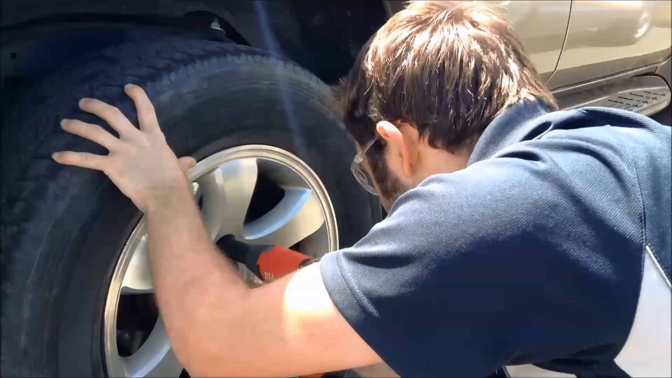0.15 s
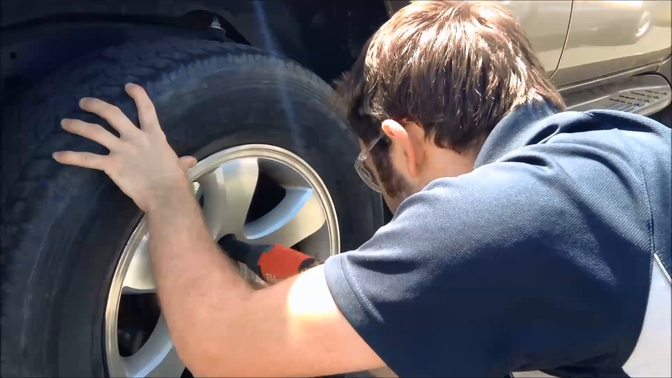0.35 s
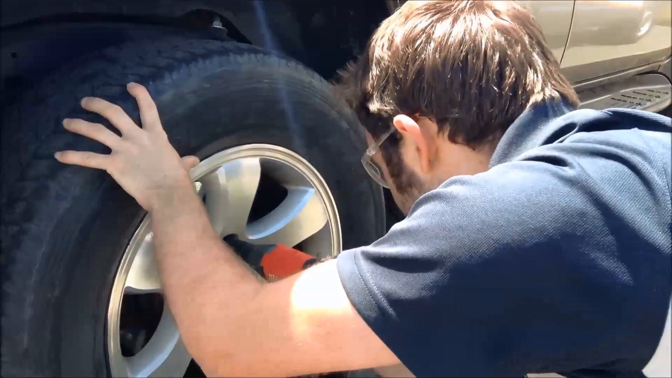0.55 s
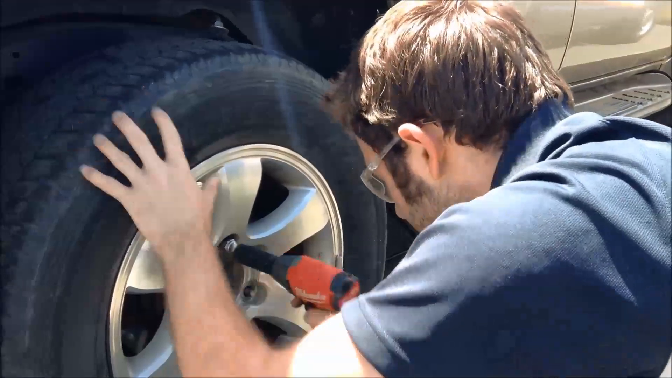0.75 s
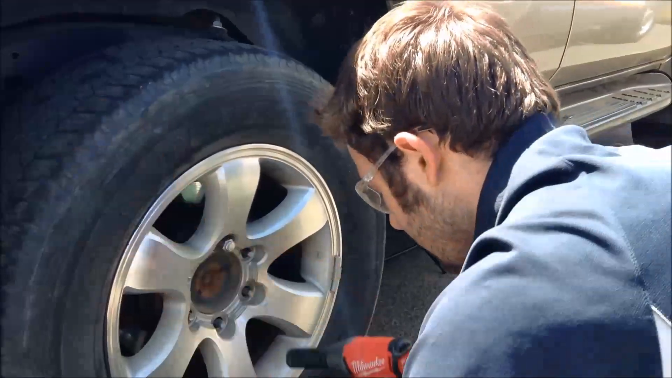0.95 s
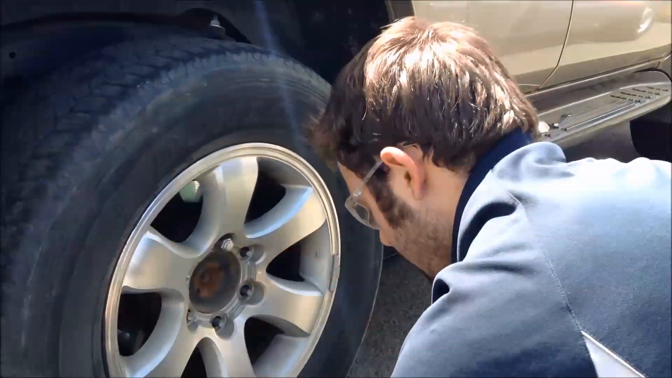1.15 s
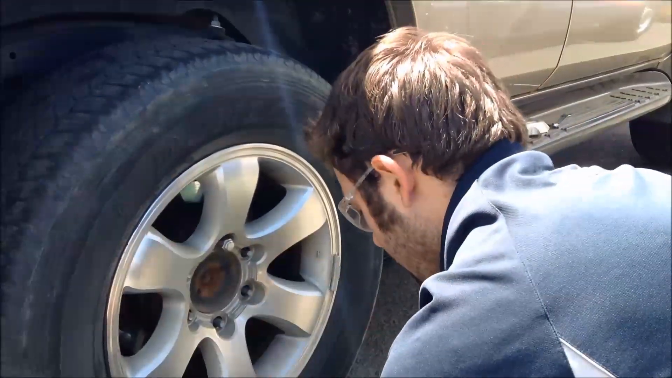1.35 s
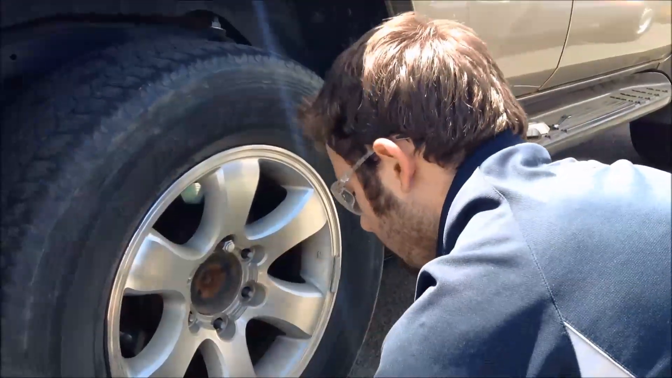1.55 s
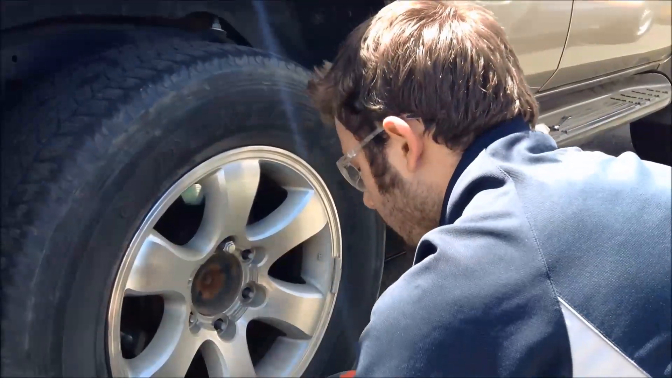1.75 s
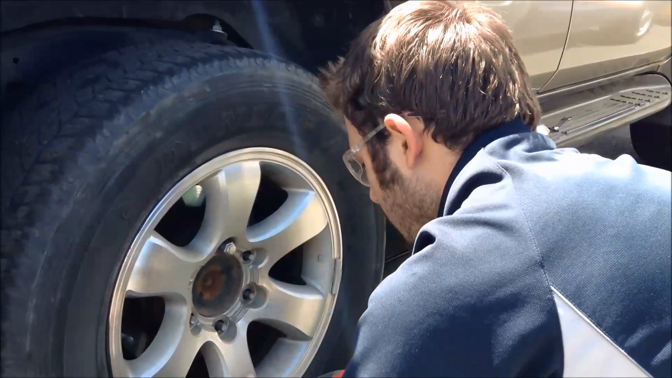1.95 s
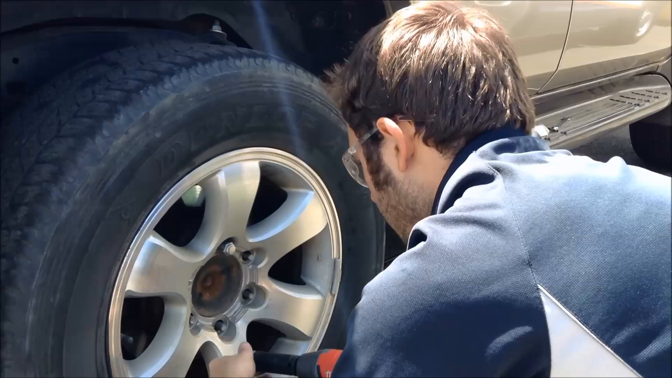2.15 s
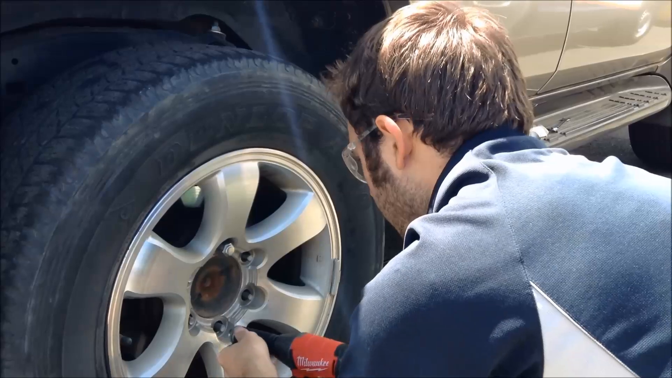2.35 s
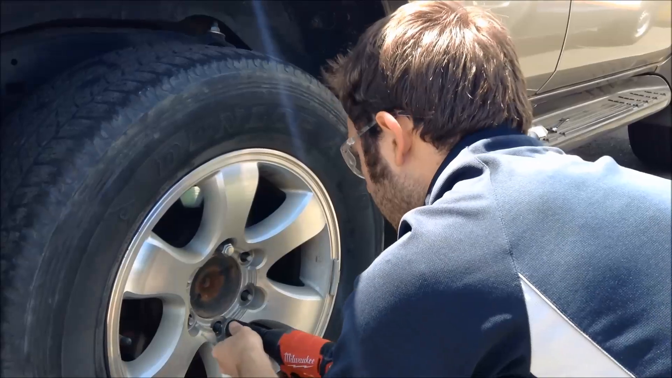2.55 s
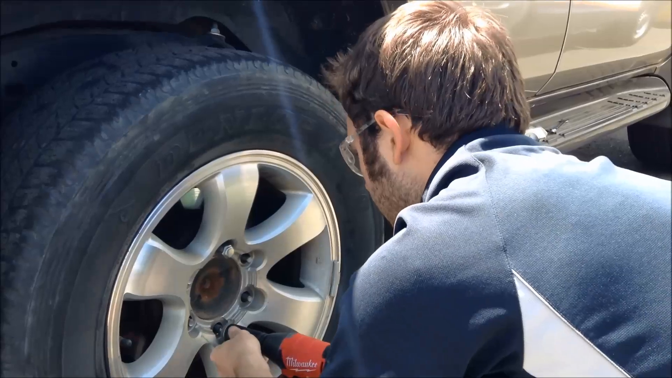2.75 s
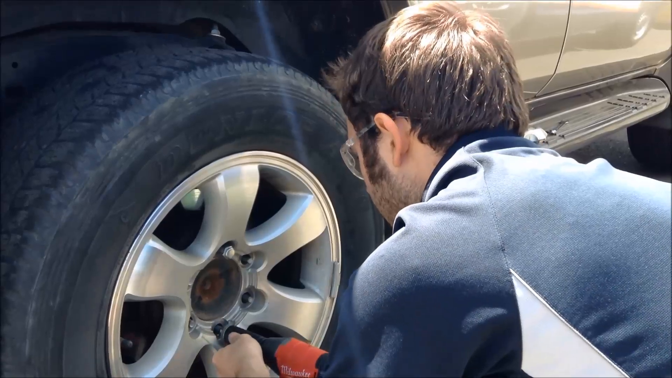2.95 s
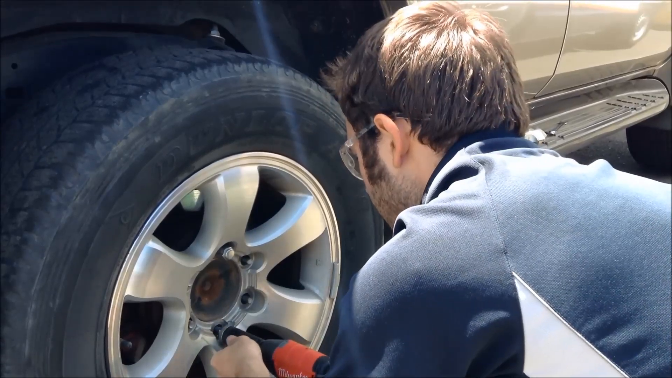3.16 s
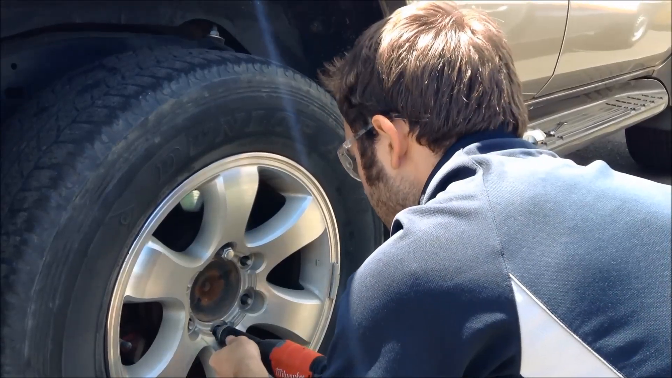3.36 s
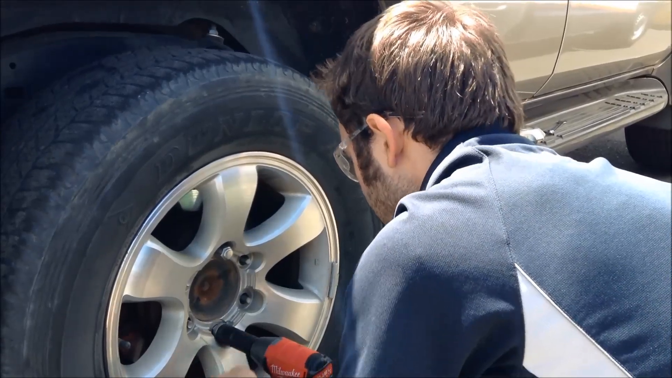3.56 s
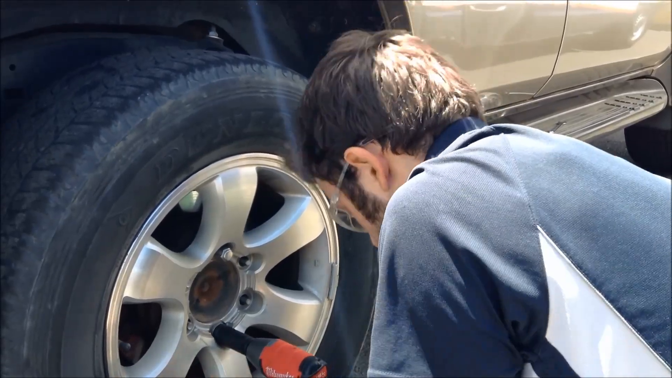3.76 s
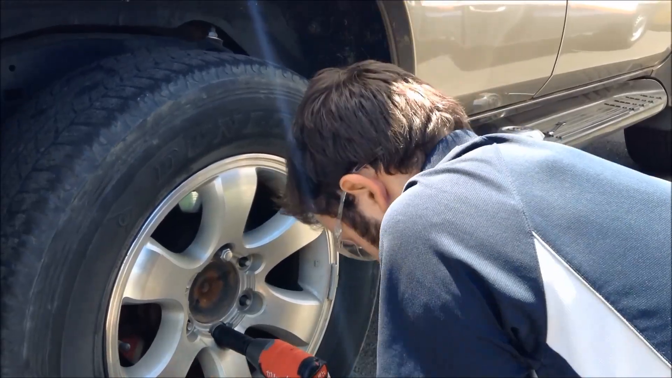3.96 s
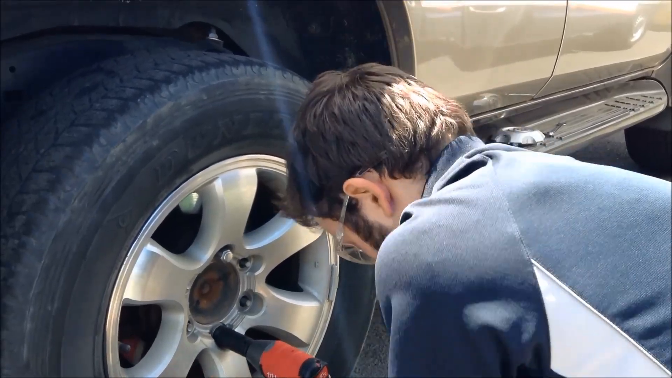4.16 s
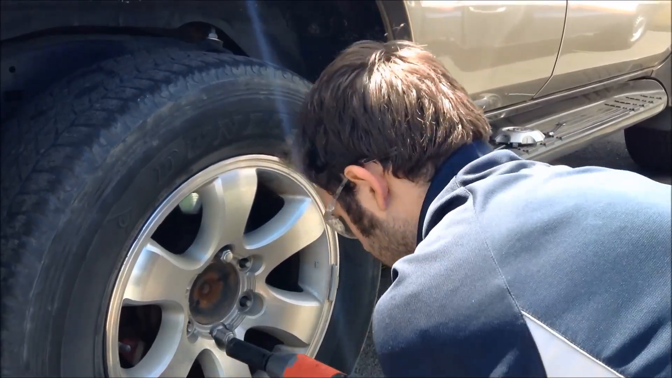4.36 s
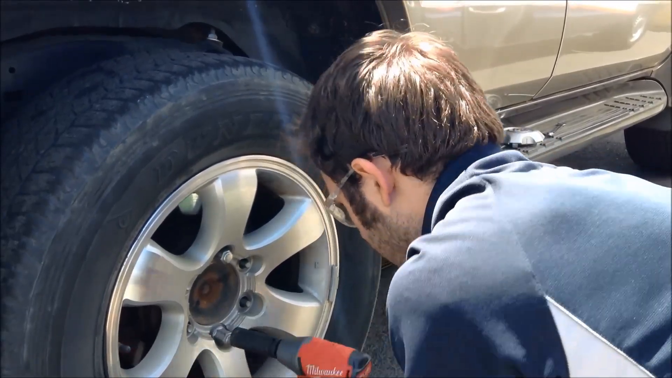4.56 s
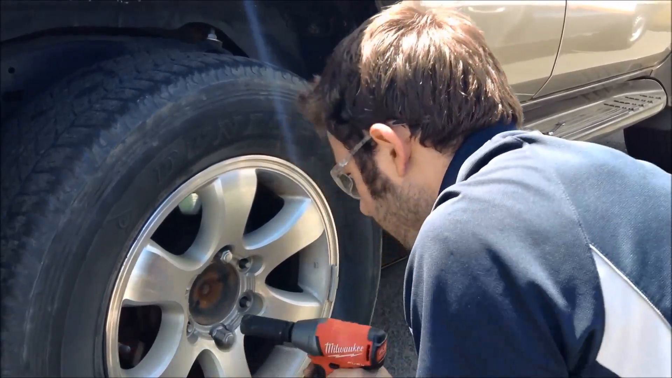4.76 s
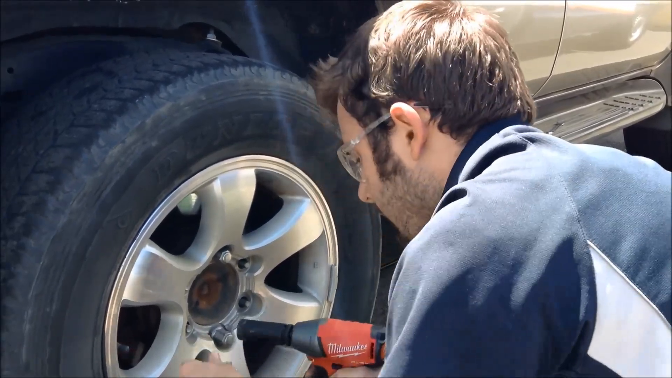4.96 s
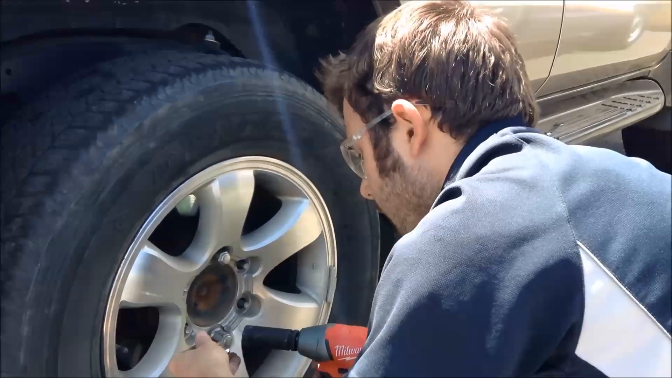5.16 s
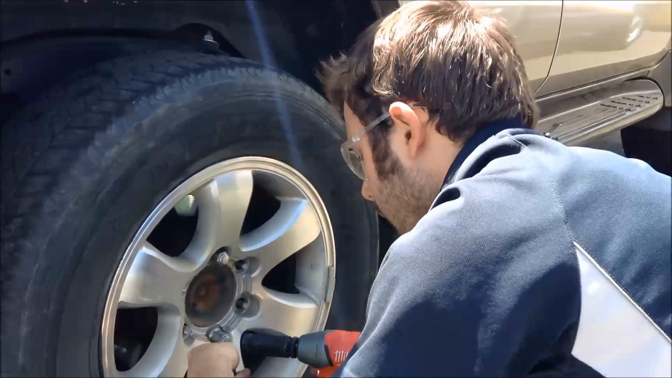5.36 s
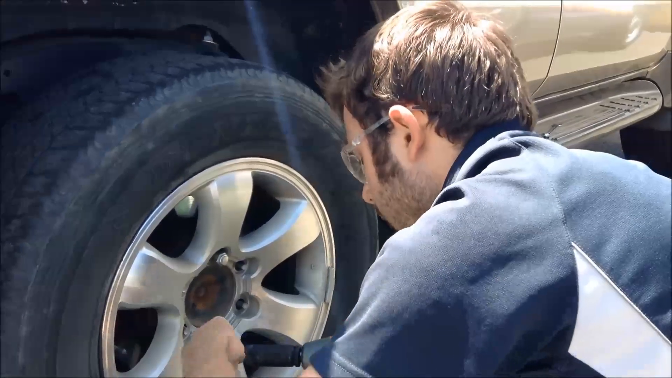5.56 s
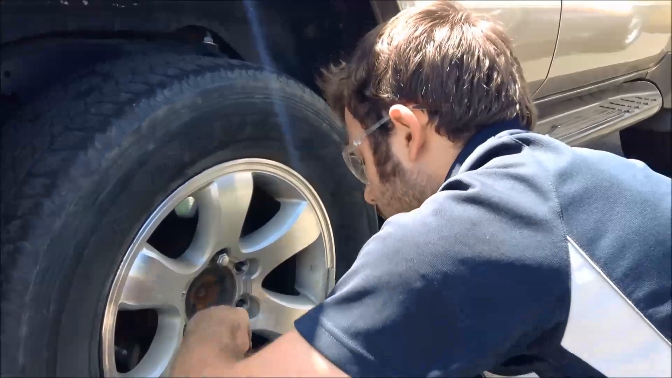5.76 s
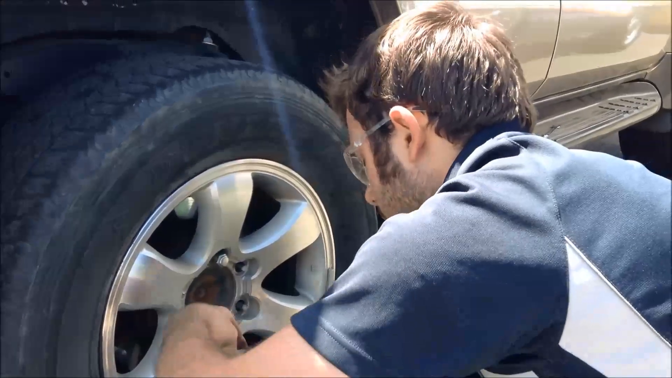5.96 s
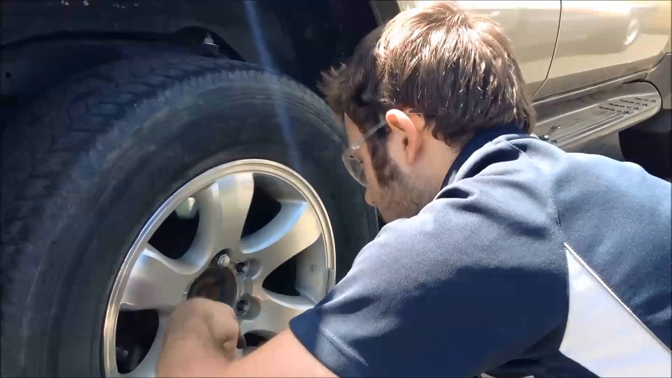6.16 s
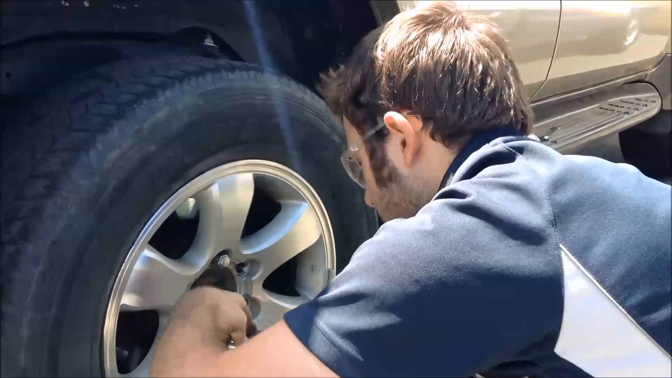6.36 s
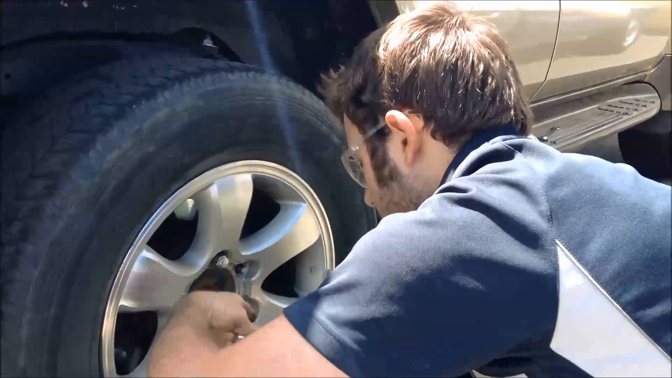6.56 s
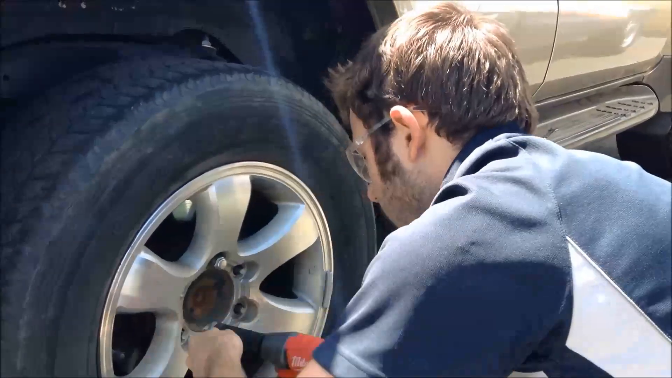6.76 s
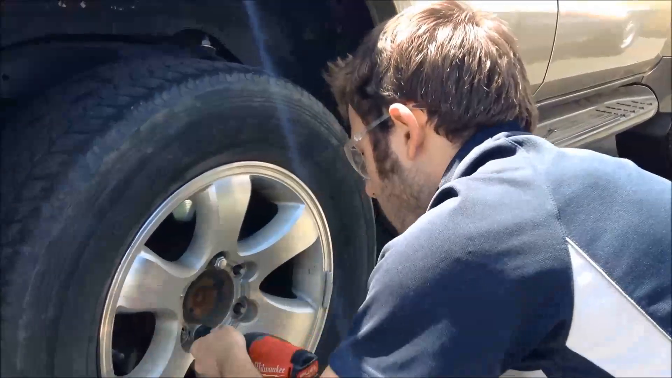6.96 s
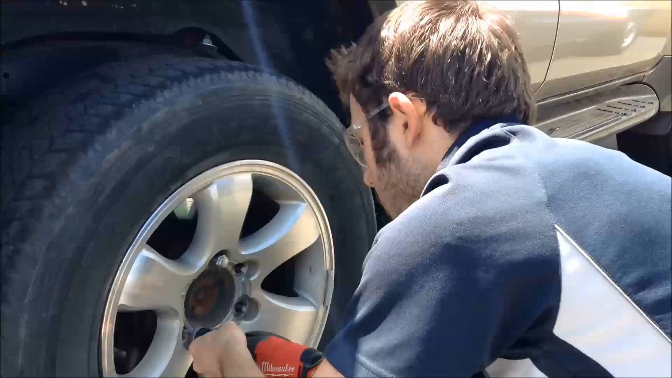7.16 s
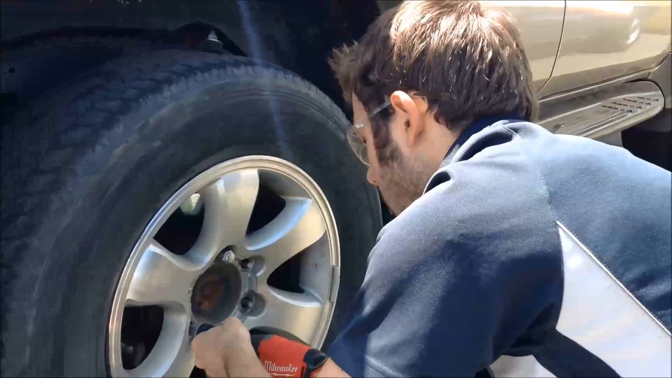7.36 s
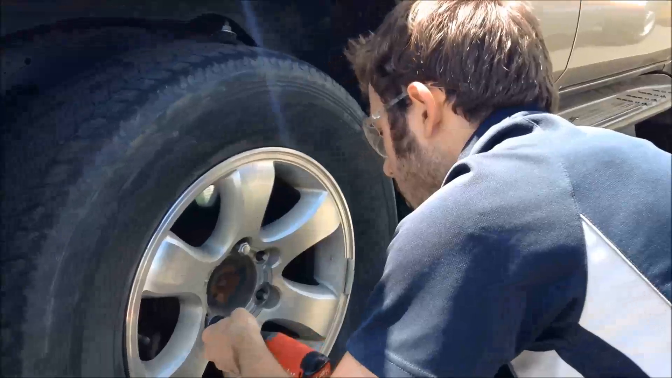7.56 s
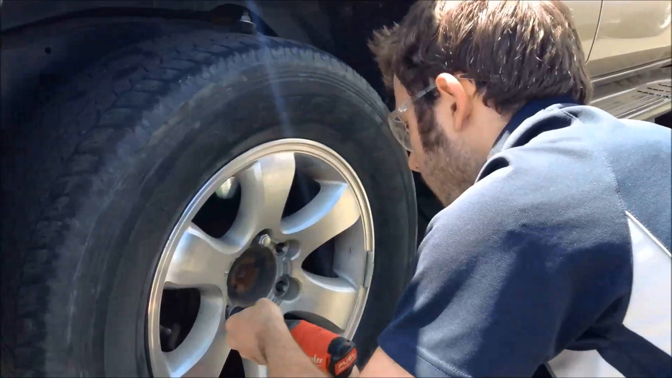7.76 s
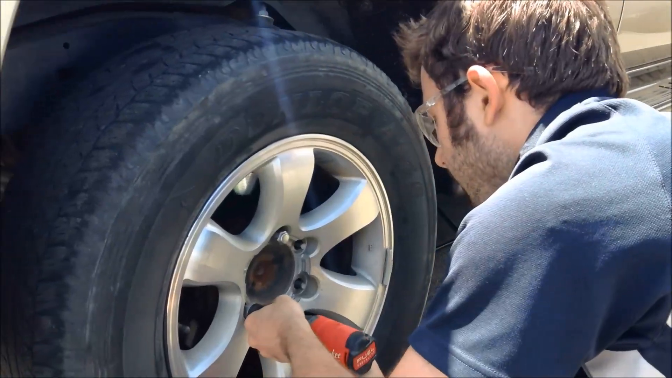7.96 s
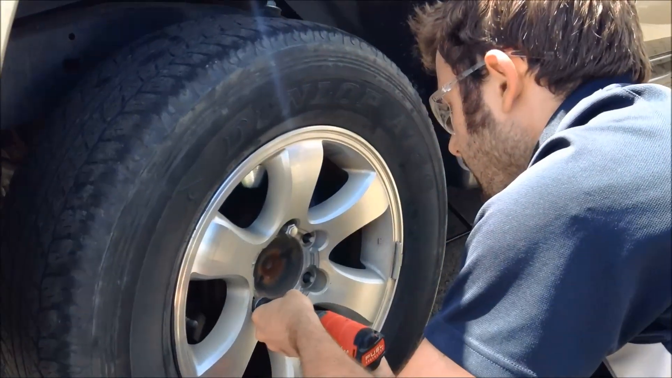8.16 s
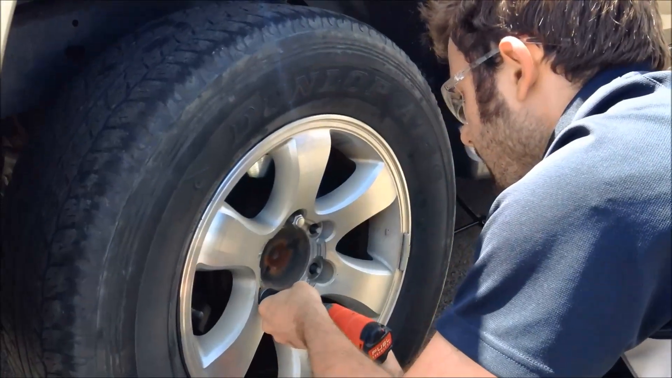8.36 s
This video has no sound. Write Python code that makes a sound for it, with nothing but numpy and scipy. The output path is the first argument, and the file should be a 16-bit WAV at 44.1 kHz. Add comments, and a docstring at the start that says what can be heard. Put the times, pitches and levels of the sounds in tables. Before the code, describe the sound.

A cordless impact wrench runs close to the microphone from the start, its motor whining and gears rattling, with sharp knocks and a fast burst of hammering on a wheel nut from 0.3 to 0.7 seconds. The alloy wheel rings briefly. From 1 to 3 seconds, nuts and socket clink lightly on the studs. At 3.1 seconds the wrench starts with two knocks, rises in pitch, then hammers loudly from 3.9 to 4.2 seconds, slightly overloading the microphone, and stops. Scattered bright clinks and clicks follow from 4.4 to 7.7 seconds, with a small scrape near 7.5. Soft, low shuffling and dull bumps grow from about 7 seconds. At 8.1 seconds the motor starts slowly again, with a few sharp cracks, running until the end at about 8.5. The garage adds a short echo, and faint, steady outdoor noise lies underneath.

```python
"""Impact wrench on wheel nuts

A garage, one microphone close to an alloy wheel as a cordless impact wrench runs the nuts on.
The motor whines, gears and socket rattle, then the hammer strikes about fifty times a second until the
nut is tight. Between runs, nuts and socket clink on the studs; low bumps and a soft outdoor murmur
lie below. The loudest cracks overload the microphone."""
import sys
import numpy as np
from scipy import signal
from scipy.fft import rfft, irfft
from scipy.io import wavfile

SR = 44100
rng = np.random.default_rng(int(sys.argv[2]) if len(sys.argv) > 2 else 0)


def store_wav(level_fs):
    """Save 16-bit WAV to argv[1]."""
    pcm = np.round(np.clip(np.atleast_2d(level_fs), -1, 1) * 32767)
    wavfile.write(sys.argv[1], SR, pcm.T.astype(np.int16))


N = 374850
TIME = np.arange(N) / SR
FULL_SPEED_HZ = 1400

# motor speed, one curve for each pull of the trigger: (time [s], commutation rate [Hz])
SPEED_CURVES = [
    [(0, 1290), (.04, 1270), (.11, 1080), (.15, 880)],
    [(.16, 450), (.22, 250), (.27, 400), (.33, 1100), (.675, 1000)],
    [(3.078, 40), (3.11, 250), (3.16, 480), (3.38, 470), (3.5, 920), (3.58, 1050), (3.7, 1100),
     (3.77, 1230), (3.84, 1270), (4.245, 1000)],
    [(8.116, 10), (8.18, 50), (8.22, 130), (8.3, 320), (8.4, 380), (8.5, 550)],
]
# runs of hammering: (first blow [s], last blow [s], nut comes tight [s], crack [dB], thump [dB])
HAMMER_RUNS = [(0.3106, 0.635, .362, -5, -39.5), (3.8725, 4.2185, 4.115, -4, -20)]
# spectrum of steel meeting steel: (frequency [Hz], level [dB])
CLACK_SPECTRUM = [(200, -13), (600, -5), (1200, -2.5), (1900, -3.5), (2700, 1.5), (3900, -0.5), (5000, -3),
                  (7000, -17.5), (15000, -37)]


def from_db(db):
    """Decibels to gain."""
    return 10 ** (np.asarray(db) / 20)


def rms_one(x):
    """Scale to unit rms."""
    return x / np.sqrt(np.mean(x ** 2) + 1e-20)


def unit_energy(x):
    """Scale a response so that it keeps the power of white noise."""
    return x / np.sqrt(np.sum(x ** 2) + 1e-20)


def drift(per_s):
    """A random wander of unit rms, with per_s new values a second."""
    knots = rng.standard_normal(N // 8)
    return rms_one(np.interp(TIME * per_s, np.arange(len(knots)), knots))


def grainy_noise(spread_db, per_s):
    """Noise of unit rms whose level flickers."""
    return rms_one(rng.standard_normal(N) * from_db(spread_db * drift(per_s)))


def through(x, response):
    """Pass a sound through an impulse response."""
    return signal.fftconvolve(x, response)[:len(x)]


def colour(x, spectrum, size=4096):
    """Shape a sound with a minimum-phase filter of unit energy."""
    hz, db = np.transpose(spectrum)
    log_hz = np.log(np.maximum(np.arange(size // 2 + 1) * SR / size, 1))
    bass_cut_db = 20 * np.maximum(np.log(hz[0]) - log_hz, 0)
    gain = from_db(np.interp(log_hz, np.log(hz), db) - bass_cut_db)
    cepstrum = irfft(np.log(gain))[:size // 2]
    cepstrum[0] = 0
    return through(x, unit_energy(irfft(np.exp(rfft(2 * cepstrum, size)))))


def mode(hz, t60):
    """A decaying sine of unit energy."""
    t = TIME[:SR]
    return unit_energy(np.sin(2 * np.pi * hz * t) * from_db(-60 * t / t60))


def add(out, s, sound):
    """Mix a sound in at a time."""
    at = max(round(s * SR), 0)
    out[at:at + len(sound)] += sound[:N - at]


def outdoor_murmur(level_db):
    """Soft, steady noise from outside, mostly low."""
    # spectrum of the open air: (frequency [Hz], level [dB])
    air_spectrum = [(24, -67.5), (40, -31.5), (82, -14.5), (247, 0), (309, -4), (333, -5.5), (368, -8),
                    (686, -7.5), (1310, -15), (1410, -15), (2450, -21.5), (12100, -33), (15500, -39)]
    return from_db(level_db) * colour(rng.standard_normal(N), air_spectrum)


def motor_speed():
    """The motor's commutation rate along time, in Hz."""
    return np.interp(TIME, *np.transpose(np.vstack(SPEED_CURVES)))


def trigger(part, run_down_s=.007):
    """Gain of "rattle" or "whine" while the trigger is held, fading quickly on either side."""
    # strength of each pull: (gear rattle [dB], drive whine [dB])
    pull_levels = [(-22, -23.5), (-17.5, -39), (-19, -22.5), (-18.5, -29.5)]
    column = ("rattle", "whine").index(part)
    gain = np.zeros(N)
    for levels, curve in zip(pull_levels, SPEED_CURVES):
        outside_s = np.abs(TIME - np.clip(TIME, curve[0][0], curve[-1][0]))
        gain += from_db(levels[column]) * np.exp(-np.minimum(outside_s / run_down_s, 20))
    return gain


def motor_whine(switching_hz, upper_db, waver_db, waver_hz, hammering_db, idle_gain):
    """Two sidebands of the drive's switching tone part as the motor speeds up; hammering ducks them."""
    speed = motor_speed()
    offset_hz = speed + waver_hz * drift(150)
    lower, upper = (np.sin(2 * np.pi * np.cumsum(switching_hz + side * offset_hz) / SR)
                    for side in (-1, 1))
    swell = idle_gain + np.sin(np.pi * speed / FULL_SPEED_HZ) ** 1.5   # loudest at half speed
    loaded = sum((TIME > first) & (TIME < last + .03) for first, last, *_ in HAMMER_RUNS)
    level = trigger("whine") * swell * from_db(waver_db * drift(110) + hammering_db * loaded)
    return np.sqrt(2) * (lower + from_db(upper_db) * upper) * level


def gear_rattle(level_db, grain_db, wobble_db, cycles_per_turn):
    """Teeth and loose socket chatter, louder with speed and swelling once a turn of the socket."""
    # spectrum of the gearbox: (frequency [Hz], level [dB])
    gear_spectrum = [(59, -47), (100, -22.5), (196, -23), (275, -16), (313, -13.5), (429, -18.5),
                     (898, -14.5), (1110, -6.5), (1460, -12), (2470, -10), (7410, -10.5), (9340, -6.5),
                     (10400, -13.5), (13900, -13), (15500, -25)]
    speed = motor_speed()
    turns = np.cumsum(speed) / SR / cycles_per_turn
    flutter = from_db(grain_db * drift(700) + wobble_db * np.sin(2 * np.pi * turns))
    chatter = rms_one(rng.standard_normal(N) * flutter)
    level = from_db(level_db) * trigger("rattle") * speed / FULL_SPEED_HZ
    return colour(chatter * level, gear_spectrum)


def gear_tones(low_db, mesh_db, steepness, waver_hz):
    """Two orders of the motor sing out of the rattle as it nears full speed."""
    speed = motor_speed()
    phase = 2 * np.pi * np.cumsum(speed + waver_hz * drift(300)) / SR
    tones = from_db(low_db) * np.sin(2 * phase) + from_db(mesh_db) * np.sin(13 / 4 * phase)
    return tones * (speed / speed.max()) ** steepness * trigger("rattle")


def wheel(force):
    """The wheel rings with whatever shakes its studs."""
    # modes of wheel, hub and brake disc: (frequency [Hz], level [dB], t60 [s])
    wheel_modes = [(287.4, -9, 0.41), (328.9, -8.5, 0.54), (1094, -1.5, 0.12), (1195, -3.5, 0.57),
                   (1660, -5.5, 0.21), (2000, -5, .2), (2360, -2, 0.3), (2508, 3, 0.15), (2680, -3.5, 0.22),
                   (3314, -5, .25), (3705, -2.5, 0.17), (3890, -9.5, 0.22), (4240, -5.5, 0.19),
                   (4355, -2.5, 0.55), (4470, -8, 0.31), (5330, -14, .15)]
    response = sum((-1) ** k * from_db(db) * mode(hz, t60) for k, (hz, db, t60) in enumerate(wheel_modes))
    return through(force, unit_energy(response))


def touches(settle_s=.032, settle_db=-28):
    """Nut and socket meet, then touch once more, softly, as they settle."""
    # (time [s], strength [dB], steel ring re strength [dB], ring pitch [Hz],
    #  socket cavity re strength [dB], contact time [s])
    meetings = [(.002, -31, 17, 13400, -15, 0.0025), (.039, -28, 13, 13000, -32, .0015),
                (0.9714, -33, -9.5, 13470, -17, 0.0012), (1.282, -47, 1, 12240, -3, 0.0018),
                (1.39, -44.5, 14, 11630, -17, .0025), (1.8217, -25.5, 5.5, 12630, -9.5, 0.0028),
                (1.9367, -22.5, 16, 13900, -34, 0.0017), (2.177, -39.5, 8, 13000, -7, 0.0019),
                (2.2463, -21, 12.5, 12880, -33, 0.0018), (2.387, -37, 17, 13000, -22, 0.0033),
                (2.66, -16, 2.5, 13900, -13, 0.0033), (2.758, -27, -0.5, 12400, -14, 0.0038),
                (2.8395, -49.5, -9, 11700, -4, 0.0033), (2.9873, -50, -6.5, 12800, 3.5, 0.0031),
                (4.4191, -47, 6, 12800, -8, .0014), (4.556, -47, 11, 12420, -14, .001),
                (5.3086, -46.5, 28, 11830, -12, 0.0016), (5.327, -49.5, 32, 11950, -8, 0.0018),
                (5.376, -47, 15, 12500, -6, .002), (5.5916, -32.5, -0.5, 12200, 0, 0.0017),
                (5.7564, -41, -9, 13500, -26, 0.00094), (5.7877, -41, 7, 12900, 2, 0.0021),
                (5.8015, -26, 11.5, 12930, -1.5, 0.0032), (5.955, -34.5, 4.5, 12800, -4.5, 0.0045),
                (6.492, -47.5, 3, 13200, 6, .006), (6.5464, -19.5, 15.5, 13570, -26, 0.0018),
                (6.637, -31.5, 4.5, 12100, -4, .0032), (6.6965, -53, 23.5, 12030, -10, 0.0012),
                (7.0961, -26, 7.5, 12740, -27, 0.0017), (7.1057, -25, 13, 13300, -16, .001),
                (7.1597, -26.5, 6.5, 13400, -30, 0.0029), (7.213, -42.5, 2, 11800, -22, .002),
                (7.376, -45, 8, 14100, -5, .0015), (7.3894, -35.5, 0, 12900, -22, .001),
                (7.436, -38.5, -5, 12300, -11.5, 0.0044), (7.4547, -41.5, 18, 11900, -8, 0.0013),
                (7.4937, -23.5, 9.5, 13000, -30, 0.0026), (7.5441, -38, 1, 13300, -25, 0.0023),
                (7.6572, -52.5, -16, 12200, 3, 0.0019)]
    waits = settle_s * rng.uniform(.8, 1.2, len(meetings))
    settling = [(s + wait, db + settle_db, *timbre) for (s, db, *timbre), wait in zip(meetings, waits)]
    return list(meetings) + settling


def clinks(scratch_db, shimmer_db, ring_db, hollow_db, hollow_hz, hollow_t60,
           brush_db, brush_s, skitter_s):
    """Steel chatters on steel: a clack and a scratch, then high modes and the socket's air cavity ring."""
    # spectra of the scratch and of the cluster of high modes: (frequency [Hz], level [dB])
    scratch_spectrum = [(2000, -29), (4500, -2.5), (6200, 2), (8000, 2), (9500, -1.5), (10600, -6),
                        (11700, -4), (15000, -6.5)]
    shimmer_spectrum = [(10500, -28), (11700, -4.5), (12300, -0.5), (12850, 6), (13300, 1), (13900, -3),
                        (14400, -16.5), (15200, -8)]
    # the free nut rings on, the hand-held socket dies fast: (ring pitch [Hz], t60 [s])
    steel_decay = [(12100, .13), (12900, 0.056), (13500, 0.019)]
    t = TIME[:SR // 3]
    clacks, scratches, shimmer, rings = np.zeros((4, N))
    # the parts brush just before they meet and skitter afterwards
    lead_s = .02
    since = t - lead_s
    brush = from_db(brush_db) * np.exp(-np.abs(since) / np.where(since < 0, brush_s, skitter_s))
    for s, db, steel_db, hz, cavity_db, contact_s in touches():
        age = np.maximum(since, 0) / contact_s
        press = age * np.exp(1 - age)
        clack_db = db - .64 * steel_db   # a free nut rings, a held one clacks
        add(clacks, s - lead_s, from_db(clack_db) * (press + brush))
        add(scratches, s - lead_s, from_db(db + scratch_db) * (press + brush))
        add(shimmer, s - lead_s, from_db(db + steel_db + shimmer_db) * press)
        steel = (steel_db + ring_db, hz, np.interp(hz, *np.transpose(steel_decay)))
        cavity = (cavity_db + hollow_db, hollow_hz, hollow_t60)
        build_up = 1 - np.exp(-(t / contact_s) ** 2)
        for level, pitch, t60 in steel, cavity:
            tone = mode(pitch, t60)[:len(t)] * build_up
            add(rings, s, from_db(db + level) * tone / np.abs(tone).max())
    chatter = grainy_noise(spread_db=2.5, per_s=1500)
    contact = colour(clacks * chatter, CLACK_SPECTRUM) + colour(scratches * chatter, scratch_spectrum)
    return contact, rings + colour(shimmer * chatter, shimmer_spectrum)


def bumps(rise_s):
    """Tool and tyre bump dully, each time with one low, dying tone."""
    # (time [s], level [dB], pitch [Hz], t60 [s])
    thuds = [(0.113, -11.5, 219, 0.1), (0.115, -20, 283.3, 0.55), (0.158, -14.5, 298, 0.14),
             (2.386, -34, 197, 0.087), (3.871, -9, 176, 0.038), (4.225, -28.5, 332.6, 0.35),
             (5.49, -32, 188, 0.045), (7.148, -19.5, 196, 0.04), (7.324, -17.5, 179, 0.032),
             (7.848, -23, 200, 0.047)]
    t, out = TIME[:SR], np.zeros(N)
    attack = 1 - np.exp(-t / rise_s)
    for s, db, hz, t60 in thuds:
        add(out, s, from_db(db - 60 * t / t60) * np.sin(2 * np.pi * hz * t) * attack)
    return out


def knocks(uneven_db, skip_s=.015, skip_db=-9.5):
    """The socket catches or the hammer stops; weaker skips over the nut's corners may follow."""
    # (time [s], crack [dB], wheel kick [dB], skips [count, rounded; none if negative])
    catches = [(.114, -17, -12.5, 2.5), (.136, 1, -13.5, 2), (0.179, -5.5, -23, -3),
               (0.2411, -4, -12.5, -1), (0.276, -7, -25.5, -2.5), (.283, -3, -19.5, 1),
               (0.659, -4, -9, 0.5), (0.666, -6, -17.5, -2), (3.124, -6, -14.5, 0.5), (3.192, -8, -25, 2),
               (4.234, -3.5, -9, 0.5), (8.2304, -1.5, -12, 4), (8.29, -5, -17, 0.5)]
    blows = []
    for s, db, kick_db, skips in catches:
        blows.append((s, db, kick_db))
        for k in range(1, round(skips) + 1):
            crack_db = db + skip_db + uneven_db * rng.standard_normal()
            blows.append((s + k * skip_s, crack_db, kick_db + skip_db))
    return blows


def hammer(blows_per_s, crack_s, rebound_db, rebound_s, thump_s, thump_hz,
           clang_s, loose_db, tight_db, kick_db, uneven_db):
    """Each blow cracks, thumps the tyre and kicks the wheel; it clangs harder once the nut is tight."""
    # spectra of the crack and of the clang: (frequency [Hz], level [dB])
    crack_spectrum = [(40, -47), (120, -36), (300, -8), (450, -5.5), (800, 0), (1200, 1.5), (1800, -1.5),
                      (2400, 4), (3000, 1.5), (3800, 1.5), (5500, 3), (7000, 1), (9500, 2), (15000, 1)]
    clang_spectrum = [(2000, -32), (3000, -12.5), (3350, -1), (3700, -1), (4200, -1.5), (4600, -6),
                      (6500, -16), (9000, -30)]
    t = TIME[:SR // 8]
    crack_power, thumps, clang_level, kicks = np.zeros((4, N))
    blows = knocks(uneven_db)
    for first, last, tight, db, thump_db in HAMMER_RUNS:
        progress = np.linspace(0, 1, round((last - first) * blows_per_s) + 1)
        for s in first + (last - first) * progress ** .98:   # the first blows come a little slower
            jitter_s = .0003 * rng.standard_normal()
            blows.append((s + jitter_s, db + uneven_db * rng.standard_normal(), db + kick_db))
            pitch = thump_hz * 2 ** rng.uniform(-.18, .66)
            add(thumps, s, from_db(thump_db) * np.exp(-t / thump_s) * np.sin(2 * np.pi * pitch * t))
            clang_db = np.interp(s, [tight - .015, tight + .015], [loose_db, tight_db])
            add(clang_level, s, from_db(clang_db) * np.exp(-t / clang_s))
    # a hard crack with a buzz of loose steel after it
    blow_power = np.exp(-(t / crack_s) ** 2) + from_db(rebound_db) ** 2 * np.exp(-t / rebound_s)
    for s, db, wheel_db in blows:
        add(crack_power, s, from_db(db) ** 2 * blow_power)
        add(kicks, s, from_db([wheel_db]))
    cracks = colour(np.sqrt(crack_power) * rng.standard_normal(N), crack_spectrum)
    clangs = colour(clang_level * rng.standard_normal(N), clang_spectrum)
    return thumps + cracks + clangs, kicks


def strokes(rows):
    """Gain of strokes that swell and fade between a start and an end."""
    gain = np.zeros(N)
    for start, end, db in rows:
        position = (2 * TIME - start - end) / (end - start)
        gain += from_db(db) * np.sqrt(np.maximum(1 - position ** 2, 0))
    return gain


def shuffling(gain_db):
    """Someone shifts about beside the wheel with a soft, lumpy rumble."""
    # (start [s], end [s], level [dB])
    moves = [(.9, 2.0, -56), (2.3, 2.85, -54.5), (3.3, 3.9, -48.5), (5.4, 6.1, -57.5), (6.77, 7.0, -51.5),
             (7.08, 7.56, -44.5), (7.58, 8.15, -44.5), (8.15, 8.6, -42.5)]
    # spectrum of the rumble: (frequency [Hz], level [dB])
    shuffle_spectrum = [(30, -47), (70, -12.5), (120, 2), (190, 6), (290, -3.5), (420, -10.5), (900, -54.5)]
    lumps = grainy_noise(spread_db=4, per_s=30)
    return from_db(gain_db) * strokes(moves) * colour(lumps, shuffle_spectrum)


def scrapes(grit_db):
    """The socket drags over a nut, steel on steel, in a stream of tiny catches."""
    # (start [s], end [s], level [dB])
    drags = [(4.66, 4.753, -54), (6.49, 6.545, -55.5), (7.429, 7.533, -42.5)]
    return colour(strokes(drags) * grainy_noise(grit_db, per_s=600), CLACK_SPECTRUM)


def garage(x, near_db, near_s, build_s):
    """The direct sound, quick reflections from ground and car, then a diffuse tail."""
    # reverberation of the garage: (frequency [Hz], t60 [s], level [dB])
    tail_bands = [(250, 0.83, -9.5), (1000, .85, -11), (2500, 0.79, -16.5), (4446, 0.88, -18.5),
                  (8190, 1, -26.5), (13000, .4, -26.5)]
    hz, t60, db = np.transpose(tail_bands)
    t = TIME[:SR]
    response = from_db(near_db) * unit_energy(rng.standard_normal(SR) * np.exp(-t / near_s) * (t > .002))
    edges = np.geomspace(100, 16000, 13)
    for low, high in zip(edges, edges[1:]):
        bandpass = signal.butter(2, [low, high], "band", fs=SR, output="sos")
        band = signal.sosfilt(bandpass, rng.standard_normal(SR))
        log_centre = np.log(low * high) / 2
        band_t60, band_db = (np.interp(log_centre, np.log(hz), column) for column in (t60, db))
        envelope = from_db(-60 * t / band_t60) * (1 - np.exp(-t / build_s))
        response += from_db(band_db) * band * unit_energy(envelope)
    return x + through(x, response)


def scene():
    """Wrench and wheel close by in the garage; the small rings of nut and socket stay dry."""
    blows, kicks = hammer(blows_per_s=49, crack_s=.003, rebound_db=-9.5, rebound_s=.011,
                          thump_s=.0076, thump_hz=201, clang_s=.01, loose_db=-22.5, tight_db=-11.5,
                          kick_db=-14.5, uneven_db=1.5)
    gears = gear_rattle(level_db=.5, grain_db=2, wobble_db=2, cycles_per_turn=42)
    nut = from_db(-21.5) * through(gears, mode(hz=15000, t60=.03))   # the spinning nut rings along
    whine = motor_whine(switching_hz=10070, upper_db=-21, waver_db=1.45, waver_hz=4.6,
                        hammering_db=-14, idle_gain=.12)
    whine += gear_tones(low_db=-9.5, mesh_db=-7, steepness=3.5, waver_hz=22)
    contact, rings = clinks(scratch_db=-1, shimmer_db=-6.5, ring_db=-5,
                            hollow_db=-.5, hollow_hz=1311, hollow_t60=.07,
                            brush_db=-16, brush_s=.003, skitter_s=.012)
    ringing = wheel(from_db(19.5) * kicks + from_db(-20) * gears + from_db(-23) * contact)
    direct = blows + gears + nut + whine + ringing + contact + scrapes(grit_db=5)
    wrench = rings + garage(direct, near_db=-11, near_s=.0083, build_s=.003)
    background = outdoor_murmur(level_db=-51.5) + shuffling(gain_db=3) + bumps(rise_s=.0029)
    return (wrench + background)[None]


def record(dry):
    """The close microphone rounds off the loudest cracks; the highest treble is cut."""
    ceiling, cutoff_hz = .67, 15400
    rounded = dry / (1 + (dry / ceiling) ** 4) ** (1 / 4)
    return signal.sosfilt(signal.ellip(12, .2, 80, cutoff_hz, fs=SR, output="sos"), rounded)


dry = scene()
out = record(dry)
store_wav(out)
```